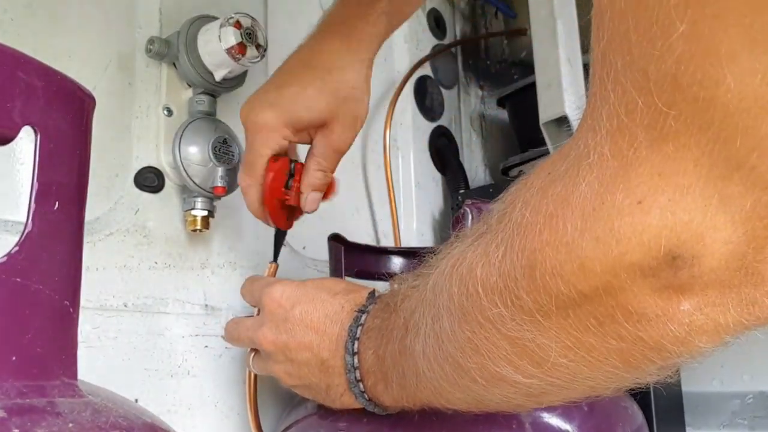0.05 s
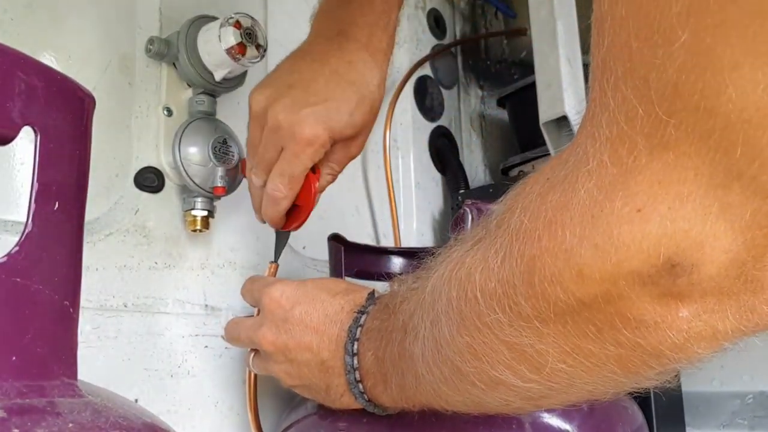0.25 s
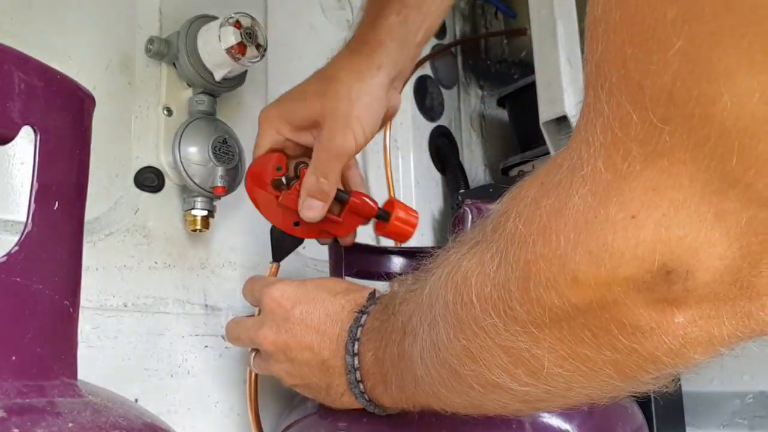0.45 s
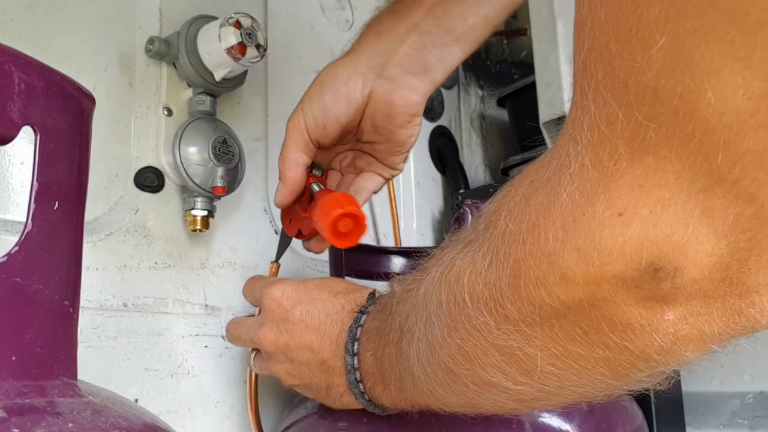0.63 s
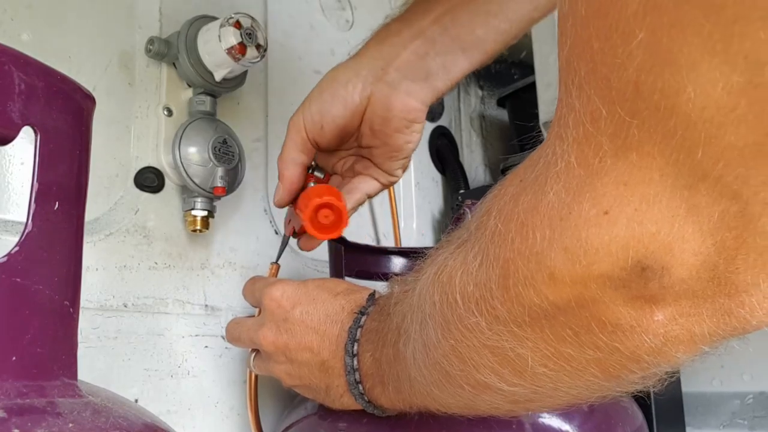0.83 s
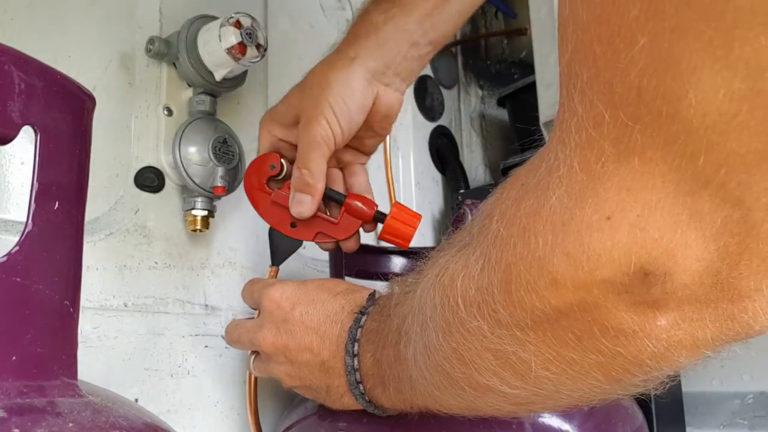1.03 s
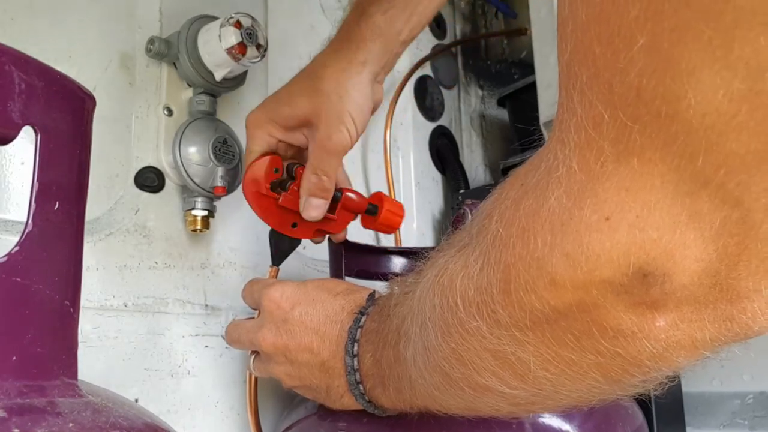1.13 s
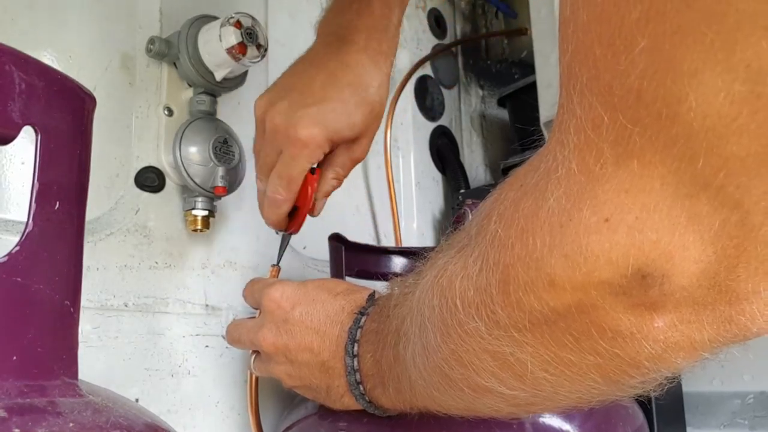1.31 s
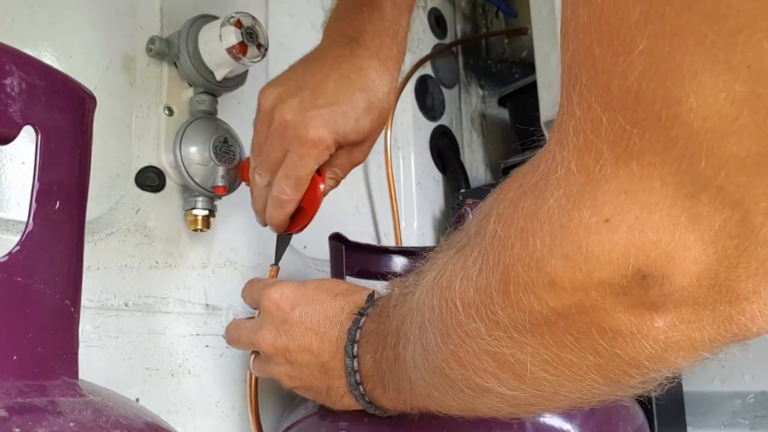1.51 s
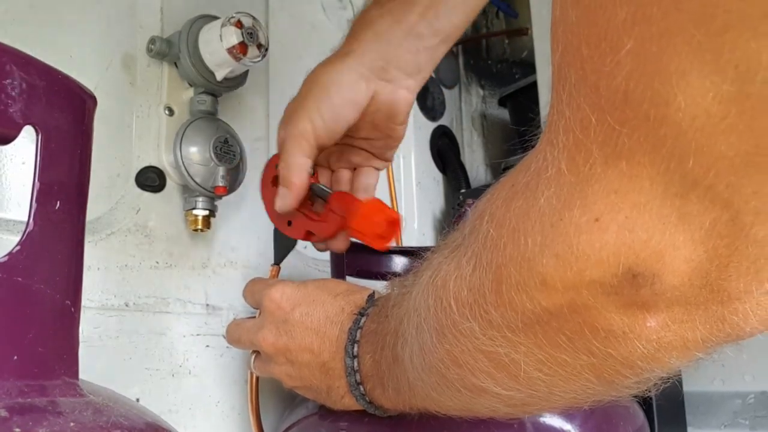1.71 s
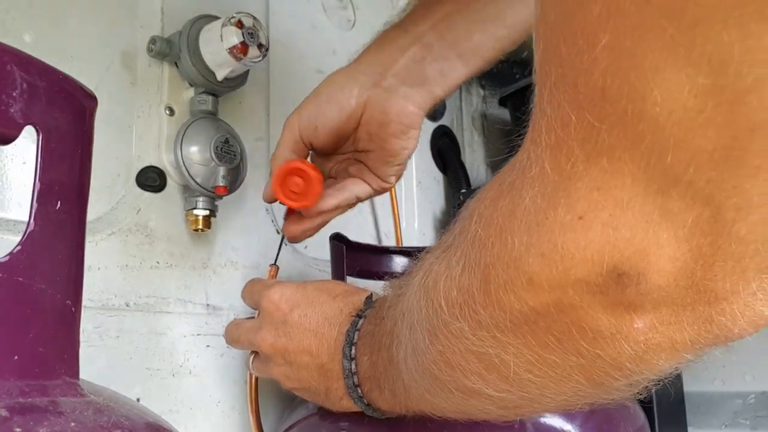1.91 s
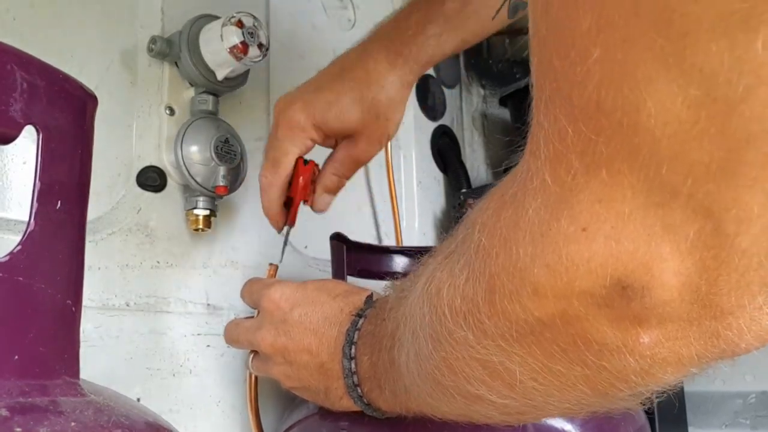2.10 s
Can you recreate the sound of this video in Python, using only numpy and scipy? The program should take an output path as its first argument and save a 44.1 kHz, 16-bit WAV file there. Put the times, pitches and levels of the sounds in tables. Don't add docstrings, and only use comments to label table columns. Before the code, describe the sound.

A metal blade scrapes inside a thin copper pipe, close up. Faint gritty scratches lead to a loud hollow panel thud with rattle and pipe ring at 0.2 s; lighter scrapes and ticks follow until 0.85. After a near-quiet lull, scraping resumes around 1.25, with a sharp ringing clack at 1.43, then snaps, tiny squeals and denser scraping to the end. Low hum, short room echoes.

```python
import sys
import numpy as np
from scipy import signal
from scipy.fft import rfft, irfft
from scipy.io import wavfile
from scipy.ndimage import uniform_filter1d

SR = 44100
rng = np.random.default_rng(int(sys.argv[2]) if len(sys.argv) > 2 else 0)


def natural_amplitude(level_db):
    exponent = np.asarray(level_db, float) / 20
    return 10 ** exponent


def log_audio(samples):
    frames = np.atleast_2d(samples).T
    limited = np.clip(frames, -1, 1)
    pcm = np.round(limited * 32767).astype(np.int16)
    wavfile.write(sys.argv[1], SR, pcm)


N = 94815

# (pitch [Hz], level [dB], time to fade by 60 dB [s])
PIPE_MODES = [(492.4, 2, 0.071), (526.5, -4.5, 0.14), (826, -2.5, 0.073), (1211, -4.5, 0.13),
              (1360, -17.5, 0.085), (1562, -14, 0.27), (1958, -9.5, 0.15), (2430, -9, 0.15),
              (2510, -13.5, 0.12), (2543, -6, 0.12), (2850, -17.5, 0.067), (3170, -25.5, 0.08),
              (4030, -31, 0.045), (4600, -21, 0.13)]
# (pitch [Hz], level [dB], time to fade by 60 dB [s])
BLADE_MODES = [(2513, -3.5, 0.16), (2595, -3, 0.1), (2782, -8.5, 0.077), (3302, -3, 0.066),
               (4234, 0, 0.012), (4800, -4, 0.0076), (6600, -20, 0.031), (6940, -36, 0.021),
               (7260, -24, 0.089), (11170, -27, 0.45)]


def level(x, db):
    return x * natural_amplitude(db) / np.sqrt(np.mean(x ** 2))


def colour(x, points):
    hz, db = np.array(points).T
    log_gain = np.interp(np.log(np.arange(513) * SR / 1024 + 1), np.log(hz), db) * np.log(10) / 20
    cepstrum = irfft(log_gain)
    cepstrum[1:512] *= 2
    cepstrum[513:] = 0
    response = irfft(np.exp(rfft(cepstrum)))
    return signal.fftconvolve(x, response / np.sqrt(np.sum(response ** 2)))[:len(x)]


def ring(x, modes):
    out = 0
    for hz, db, t60 in modes:
        decay = np.exp(-np.log(1000) / (t60 * SR))
        turn = 2 * np.pi * hz / SR
        feedback = [1, -2 * decay * np.cos(turn), decay * decay]
        out = out + natural_amplitude(db) * signal.lfilter([np.sin(turn)], feedback, x)
    return out


def wobble(rate, size=N):
    k = int(SR / rate)
    smooth = uniform_filter1d(uniform_filter1d(rng.standard_normal(size), k), k)
    return np.sqrt(1.5 * k) * smooth


def strokes():
    # (start [s], length [s], pipe level [dB], grit level [dB], panel level [dB])
    stroke_list = [(-.03, 0.11, -84, -65.5, -73), (0.08, 0.078, -85, -60.5, -88),
                   (0.159, 0.026, -58, -62, -30.5), (0.212, 0.098, -56, -59.5, -27.5),
                   (0.318, 0.1, -55, -61, -61), (0.444, 0.087, -63, -60.5, -41),
                   (0.551, 0.042, -63.5, -61.5, -44.5), (0.632, 0.066, -59.5, -63.5, -41),
                   (0.68, 0.054, -58.5, -60.5, -40), (0.733, 0.12, -65.5, -68.5, -51),
                   (1.233, 0.078, -84, -60.5, -60), (1.319, 0.21, -58.5, -56, -39.5),
                   (1.44, 0.062, -44, -51, -30.5), (1.519, 0.11, -55.5, -56, -35),
                   (1.634, 0.062, -42.5, -50, -75), (1.671, 0.15, -54, -53, -36),
                   (1.779, 0.066, -41.5, -54, -33.5), (1.861, 0.062, -51.5, -66, -38),
                   (1.967, 0.046, -51.5, -69, -80), (1.999, .05, -35, -45.5, -62),
                   (2.044, 0.05, -45.5, -45, -32.5), (2.08, 0.055, -41.5, -48, -26)]
    rise_share, fall_s = 0.27, 0.035
    t, out = np.arange(N) / SR, np.zeros((3, N))
    for start, length, *db in stroke_list:
        rise = np.clip((t - start) / (rise_share * length), 0, 1)
        fall = np.exp(-np.clip(t - start - length, 0, None) / fall_s * 3)
        out += natural_amplitude(np.array(db))[:, None] * rise * fall
    return out


def slips():
    slips_per_s, spread_db = 3000, 3
    patchy_db, patches_per_s = 2.6, 140
    hit = rng.random(N) < slips_per_s / SR
    size = natural_amplitude(spread_db * np.clip(rng.exponential(size=N), 0, 2))
    clicks = hit * size * np.sign(rng.standard_normal(N))
    friction = level(clicks, -3) + rng.standard_normal(N)
    return level(friction, 0) * natural_amplitude(patchy_db * wobble(patches_per_s))


def gripped(x, modes):
    grip_db, grips_per_s = 3, 20
    return sum(ring(x, [mode]) * natural_amplitude(grip_db * wobble(grips_per_s)) for mode in modes)


def snaps():
    # (time [s], peak level [dB], centre [Hz], chatter fade by 60 dB [s], pipe ring [dB])
    snap_list = [(0.094, -53, 4660, 0.16, 15.5), (0.216, -22, 5480, 0.049, 5.5),
                 (0.3629, -52, 2540, 0.24, 22), (0.4664, -35.5, 5133, 0.078, -12),
                 (0.4768, -44.5, 2510, 0.052, 21), (0.498, -47, 4230, 0.14, 14.5),
                 (0.6487, -51, 5070, 0.14, 3), (0.6936, -48.5, 3900, 0.058, 11),
                 (0.7443, -45, 5440, 0.087, 14), (0.7571, -31.5, 8140, 0.048, 7),
                 (1.0763, -57.5, 2230, 0.075, 10), (1.2309, -32, 6860, 0.047, 4),
                 (1.277, -38.5, 5340, 0.034, -21), (1.3364, -42, 3660, 0.16, 15),
                 (1.3587, -52, 2500, 0.2, 28.5), (1.433, -15, 2710, 0.072, 15.5),
                 (1.6258, -31.5, 3280, 0.085, 18), (1.686, -23, 4650, 0.031, 5),
                 (1.9426, -39, 3360, 0.083, 12), (1.963, -28, 5850, 0.035, 9),
                 (2.0488, -28.5, 1780, 0.1, -7), (2.065, -31, 6800, 0.071, 16),
                 (2.0766, -31.5, 5800, 0.13, -8), (2.1233, -34, 5740, 0.13, -9)]
    # (frequency [Hz], level [dB])
    crack_tone = [(880, -45), (1500, -39), (2450, 6.5), (6430, 3.5), (15200, 2), (16500, -49)]
    chatter_db, rise_s = 4, 0.0015
    t = np.arange(6000) / SR
    crack, kick = np.zeros(N + 6000), np.zeros(N + 6000)
    for start, db, hz, t60, ring_db in snap_list:
        loudness = natural_amplitude(chatter_db * wobble(750, size=len(t)) - 60 * t / t60 + db)
        burst = rng.standard_normal(len(t)) * loudness * np.minimum(t / rise_s, 1)
        bright = signal.lfilter(*signal.iirpeak(min(hz, 15000), 1 / 0.17, fs=SR), burst)
        i = int(start * SR)
        crack[i:i + len(t)] += 0.52 * colour(burst, crack_tone) + natural_amplitude(2.5) * bright
        kick[i:i + len(t)] += natural_amplitude(ring_db) * burst
    blade = 0.069 * natural_amplitude(-24) * ring(kick[:N], BLADE_MODES)
    pipe = 0.0087 * gripped(np.diff(kick)[:N], PIPE_MODES)
    return crack[:N] + blade + pipe


def tool(pipe, grit):
    # (frequency [Hz], level per Hz [dB])
    grit_tone = [(410, -42.5), (700, -21), (1940, -7), (3030, -9), (7010, -13), (16000, -21.5)]
    pipe_ring = 0.025 * gripped(pipe * slips(), PIPE_MODES)
    scrape = colour(grit * slips(), grit_tone)
    blade_ring = 0.018 * ring(grit * slips(), BLADE_MODES)
    return pipe_ring + scrape + blade_ring + snaps()


def squeaks():
    # (start [s], length [s], pitch [Hz], level [dB])
    squeal_list = [(.167, 0.024, 2477, -57.5), (.358, 0.026, 2444, -51), (0.65, 0.022, 1200, -49.5),
                   (1.36, 0.023, 1211, -58), (1.437, .01, 2510, -31), (1.6273, 0.0096, 2433, -31.5),
                   (1.628, 0.0068, 2817, -34.5), (1.644, 0.0052, 2538, -31.5), (1.681, 0.027, 1211, -46),
                   (1.803, .11, 1562, -52), (1.821, 0.043, 826, -51.5), (2.013, 0.014, 1958, -45),
                   (2.035, 0.021, 1211, -40), (2.079, 0.0034, 4030, -34), (2.083, 0.025, 1958, -40.5),
                   (2.1, 0.018, 1211, -40)]
    t, out = np.arange(N) / SR, 0
    for start, length, hz, db in squeal_list:
        rise = np.clip((t - start) * 500, 0, 1)
        fall = natural_amplitude(-60 * np.clip(t - start - length, 0, None) / 0.02)
        loudness = natural_amplitude(db + 2.0 * wobble(200))
        tone = np.sin(2 * np.pi * hz * t + 0.5 * wobble(hz / 12))
        out = out + loudness * rise * fall * tone
    return out


def ticks():
    # (time [s], peak level [dB], pitch [Hz], time to fade by 60 dB [s])
    tick_list = [(0.2153, -26, 5530, 0.0082), (.2195, -31, 4900, 0.007), (0.4657, -35.5, 5600, .012),
                 (0.478, -44, 4240, 0.02), (0.48, -42, 7000, .025), (0.502, -41.5, 2850, .025),
                 (0.757, -35, 4500, .006), (1.231, -38.5, 4320, .02), (1.4327, -18.5, 6720, 0.0054),
                 (1.435, -17, 3264, 0.014), (1.629, -31.5, 3470, 0.024), (1.6332, -31, 6640, 0.019),
                 (1.6858, -24, 5900, 0.0021), (1.6883, -23.5, 4580, 0.0027), (1.693, -29, 6900, 0.011),
                 (1.9643, -27, 6050, 0.0052), (2.0507, -27, 1230, 0.009), (2.055, -33, 1890, 0.064),
                 (2.0668, -27, 6460, 0.0079), (2.0797, -26, 6800, 0.0048), (2.08, -45, 3200, 0.0033),
                 (2.112, -33, 1340, .015), (2.126, -26, 5260, 0.0044)]
    t, out = np.arange(N) / SR, 0
    for start, db, hz, t60 in tick_list:
        fade = natural_amplitude(db - 60 * np.clip(t - start, 0, 1) / t60)
        out = out + fade * np.sin(2 * np.pi * hz * (t - start)) * (t > start)
    return out


def panel(rub):
    # (time [s], level [dB], contact time [ms], direction and strength [-1 to 1])
    blow_list = [(0.2145, -24, 1.1, -0.92), (.2168, -16, 1.42, 0.96), (0.2181, -7, 2.04, 0.94),
                 (0.2194, -11, 2.6, -0.43), (0.2249, -6, 2.85, 0.81), (0.2355, -12, 2.46, 0.79),
                 (1.433, -29.5, 0.69, -0.42), (1.4376, -21, 1.18, -0.74), (1.34, -38.5, 3, 0.53),
                 (0.332, -44, 1.7, 0.45), (0.359, -38.5, 1.2, -0.65), (0.383, -24, 3.03, 0.5),
                 (0.698, -45, 0.85, 0.67), (1.4357, -19, 1.98, 0.63), (1.443, -18, 1.1, 0.59),
                 (1.4539, -18.5, 0.84, 0.66), (1.468, -29, 2.8, 1), (1.517, -23, 1.8, 0.6),
                 (1.524, -24, 2.06, 0.87), (1.537, -36, 2.7, 1), (1.609, -27.5, 1.76, 0.4),
                 (1.751, -38, 2.1, 0.56), (1.8, -34, 1.66, .7), (1.376, -33.5, 5.9, 0.77),
                 (1.861, -32, 5.1, 0.8), (1.896, -31, 4.83, 0.94), (2.048, -37.5, 1.9, 1)]
    # (pitch [Hz], level [dB], time to fade by 60 dB [s])
    panel_modes = [(62, -43, 0.31), (100.5, 5, 0.21), (130.2, -9.5, 0.22), (170.7, -2.5, 0.29),
                   (220.1, -5, 0.31), (257.6, 0, 0.14), (278.3, 1.5, 0.092), (306.6, -3, 0.17),
                   (400, -9.5, 0.18), (471.7, 9.5, 0.034), (536, -2.5, 0.27), (600, -5.5, 0.23),
                   (700, -11.5, 0.072), (826, 4, 0.043)]
    # (pitch [Hz], level [dB], time to fade by 60 dB [s])
    knocked_modes = [(539, 1, 0.85), (837, -11, 0.086), (1343, -13.5, 0.57), (1211, -15.5, 0.25),
                     (1565, -8.5, 0.76), (2510, -9.5, 0.52), (1640, -9, .3), (1954, -22, 0.15)]
    rattle_hz, rattle_t60_s = 580, 0.03
    t, force = np.arange(N) / SR, 0
    for start, db, ms, direction in blow_list:
        push = np.sin(np.pi * np.clip((t - start) * 1000 / ms, 0, 1))
        force = force + direction * natural_amplitude(db) * push * 1000 / ms / SR
    shake = signal.lfilter([1], [1, -natural_amplitude(-60 / rattle_t60_s / SR)], np.abs(force))
    band = signal.iirpeak(rattle_hz, 0.8, fs=SR)
    rattle = signal.lfilter(*band, signal.lfilter(*band, shake * rng.standard_normal(N)))
    jolt = np.diff(force, n=2, prepend=[0, 0])
    return ring(force + rub, panel_modes) + natural_amplitude(1) * rattle + natural_amplitude(26.5) * ring(jolt, knocked_modes)


def room(x):
    t60_s, bass_hz = 0.095, 690
    t = np.arange(int(0.3 * SR)) / SR
    tail = rng.standard_normal((2, len(t))) * natural_amplitude(-60 * t / t60_s) * (t > 0.0006)
    tail = signal.sosfilt(signal.butter(4, bass_hz, "high", fs=SR, output="sos"), tail)
    tail = tail / np.sqrt(np.sum(tail[0] ** 2))
    return natural_amplitude(-2.5) * signal.fftconvolve(x[None], tail, axes=1)[:, :N]


def floor():
    # (frequency [Hz], level per Hz [dB])
    quiet_tone = [(25, -13.5), (60, -4), (124, -11.5), (160, -20), (520, -29), (640, -41), (8000, -45),
                  (15000, -36.5)]
    # (time [s], rumble level [dB])
    lean_curve = [
        (0, -51),
        (.09, -46.5),
        (.3, -34),
        (1.2, -46.5),
    ]
    hum_hz, drift_hz, hum_db = 115.7, 3.12, -54.5
    points_hz, points_db = np.array(quiet_tone).T
    hz = np.arange(N // 2 + 1) * SR / N + 1
    gain = natural_amplitude(np.interp(np.log(hz), np.log(points_hz), points_db))
    width = [hz ** 0, np.clip(hz / 900, 0.1, 1)]
    noise = rfft(rng.standard_normal((2, N)))
    mid, side = irfft(noise * gain * width, N + 1)[:, :N]
    both = level(np.array([mid + side, mid - side]), -53)
    low = signal.sosfilt(signal.butter(2, 400, fs=SR, output="sos"), both)
    hum = np.sin(2 * np.pi * np.cumsum(hum_hz + drift_hz * wobble(11.4)) / SR)
    hum = hum * natural_amplitude(3.3 * wobble(8.9))
    lean = natural_amplitude(np.interp(np.arange(N) / SR, *np.array(lean_curve).T) + 51)
    return both - low + (low + level(hum, hum_db)) * lean


def scene():
    pipe, grit, rub = strokes()
    hand = tool(pipe, grit) + squeaks() + ticks()
    board = panel(0.0036 * rub * slips())
    direct = hand + board
    side = natural_amplitude(-5.5) * tool(pipe, grit)
    side = side + natural_amplitude(-4) * signal.hilbert(hand).imag
    high_pass = signal.butter(2, 422, "high", fs=SR, output="sos")
    side = side - natural_amplitude(-7) * signal.sosfiltfilt(high_pass, board)
    balance = natural_amplitude(np.array([[-1.5], [1.5]]) / 2)
    ports = (direct + side * np.array([[1], [-1]])) * balance
    return ports + room(direct) + floor()


def roll_off(x):
    return signal.sosfilt(signal.butter(12, 16970, fs=SR, output="sos"), x)


def record(dry):
    x = signal.sosfilt(signal.butter(3, 62.5, "high", fs=SR, output="sos"), dry)
    x = signal.sosfilt(signal.cheby1(8, 0.5, 15900, fs=SR, output="sos"), x)
    top = signal.sosfiltfilt(signal.butter(8, 7700, "high", fs=SR, output="sos"), x)
    mix = np.clip(x - (1 - natural_amplitude(-6.5)) * top, -1, 1)
    return roll_off(mix)


dry = scene()
out = record(dry)
log_audio(out)
```